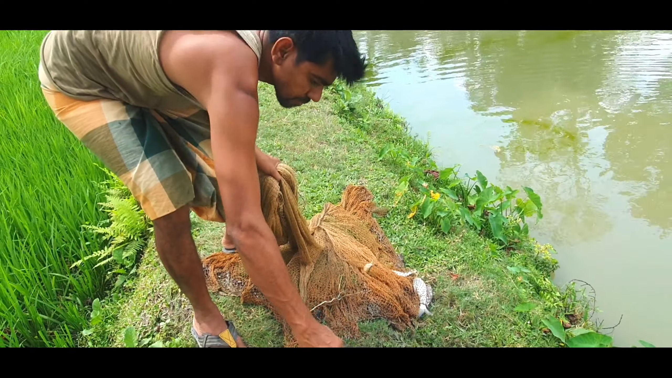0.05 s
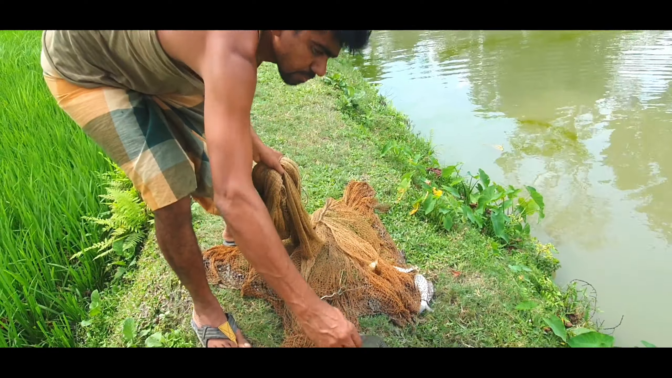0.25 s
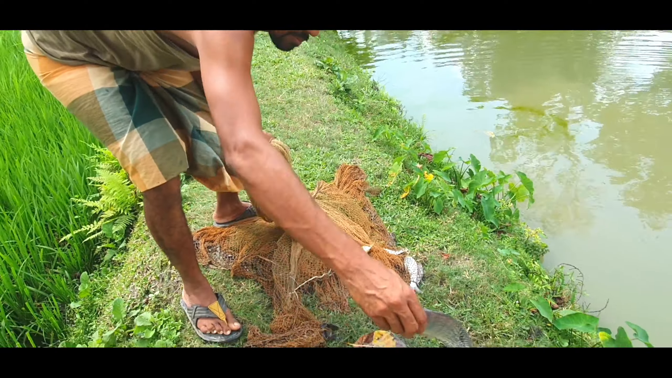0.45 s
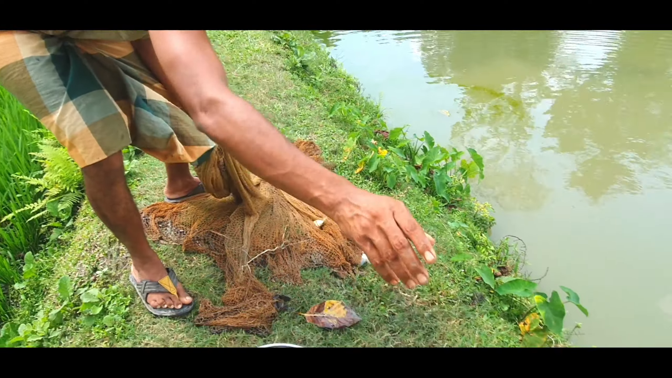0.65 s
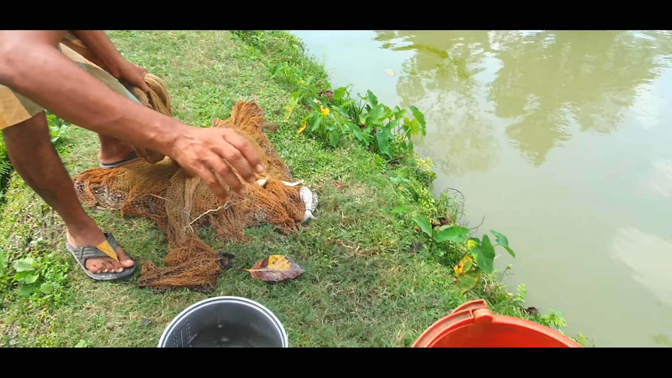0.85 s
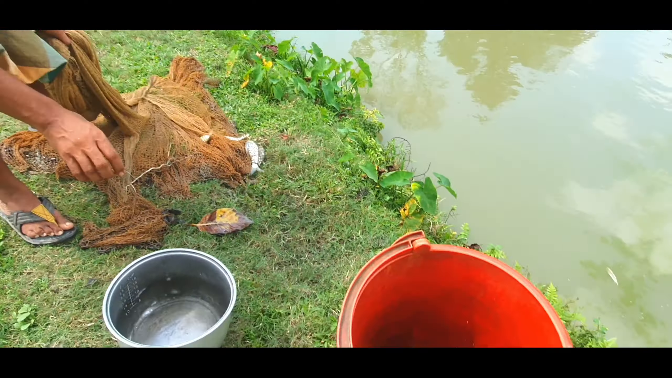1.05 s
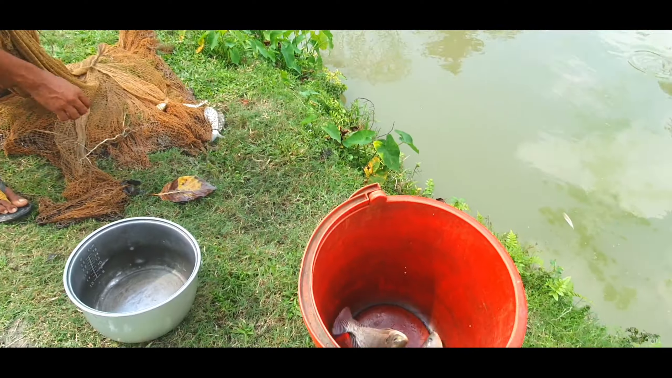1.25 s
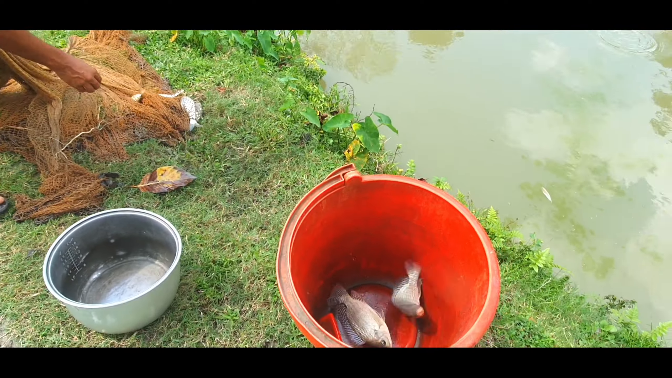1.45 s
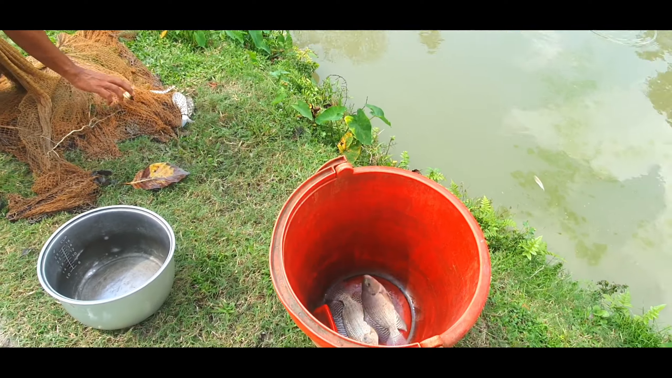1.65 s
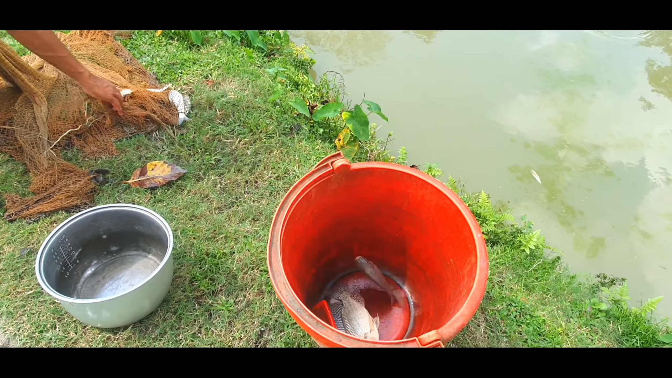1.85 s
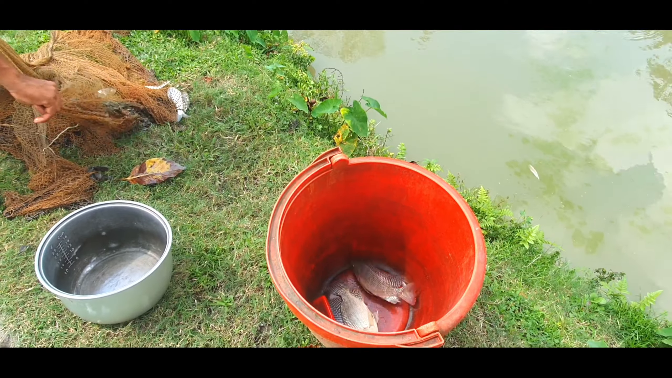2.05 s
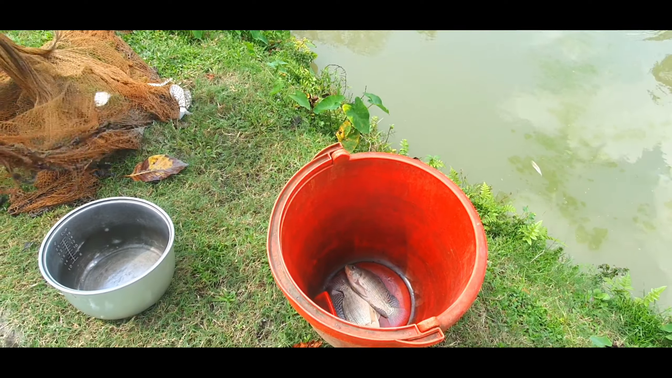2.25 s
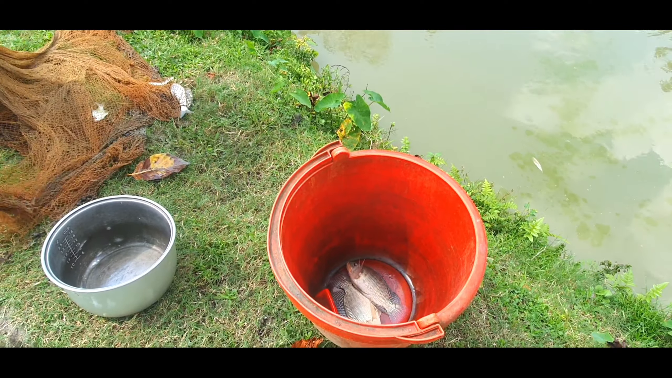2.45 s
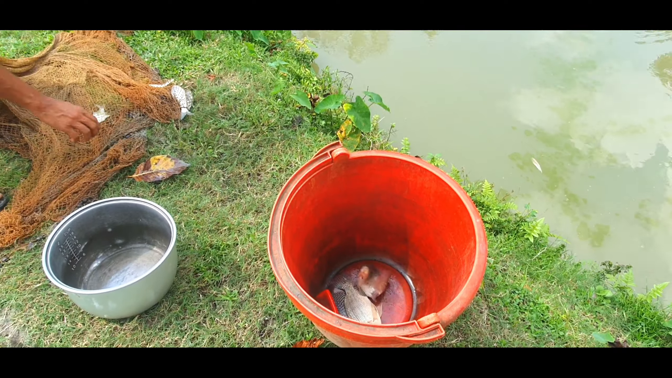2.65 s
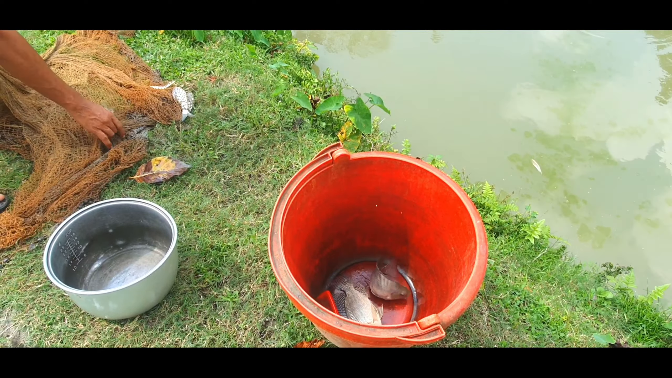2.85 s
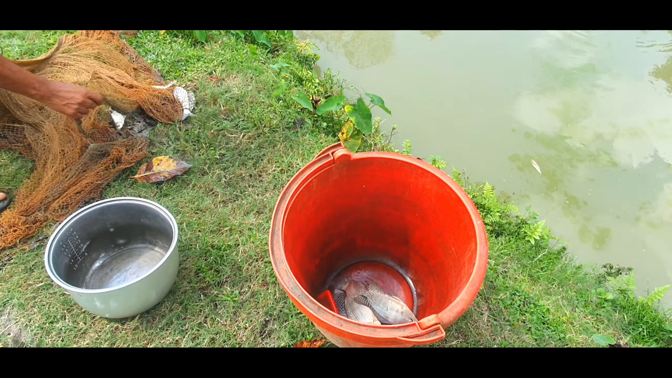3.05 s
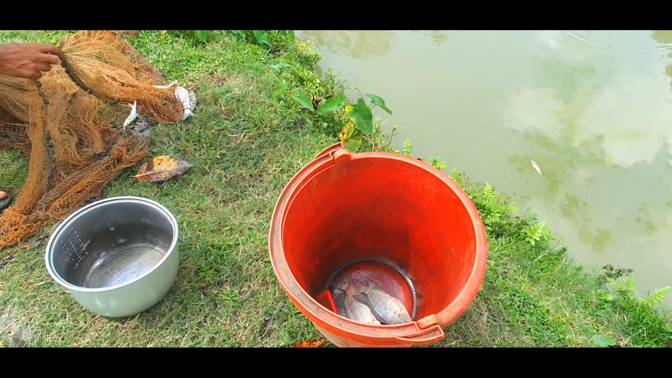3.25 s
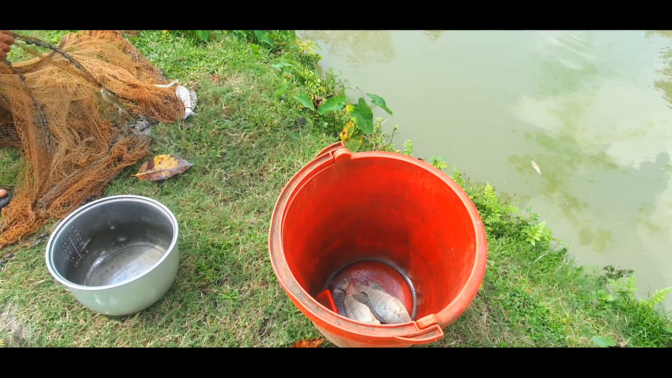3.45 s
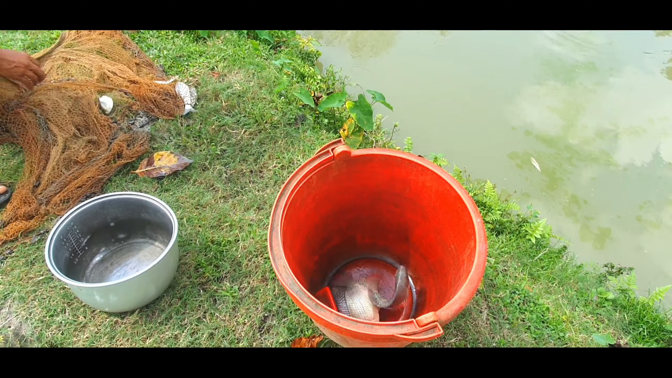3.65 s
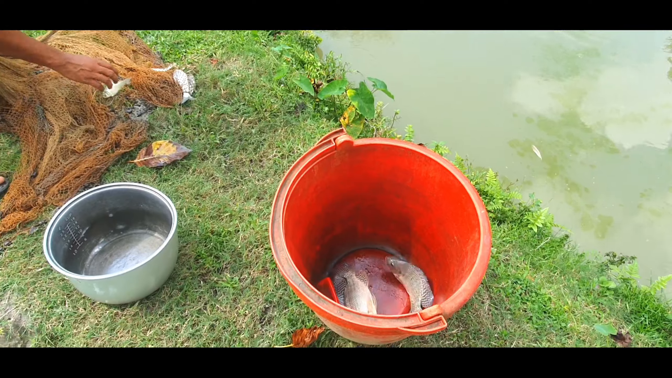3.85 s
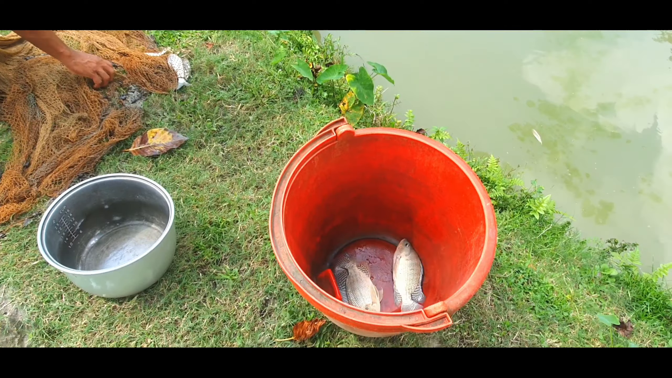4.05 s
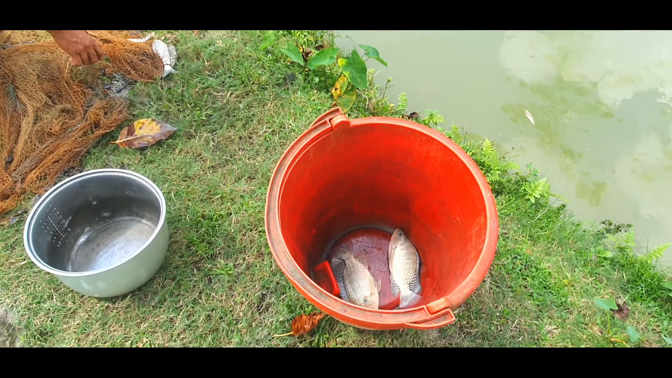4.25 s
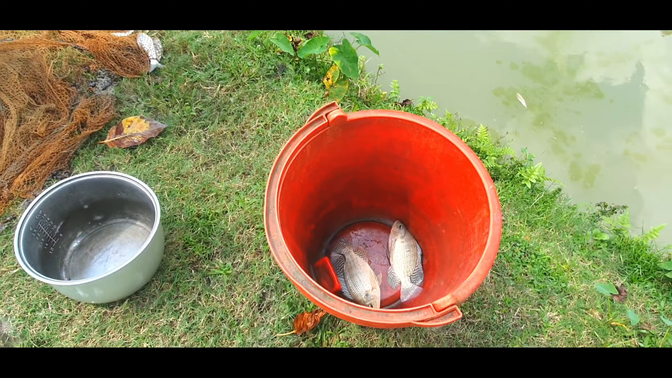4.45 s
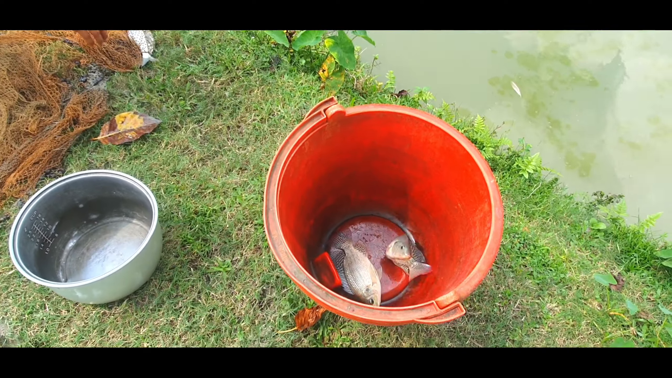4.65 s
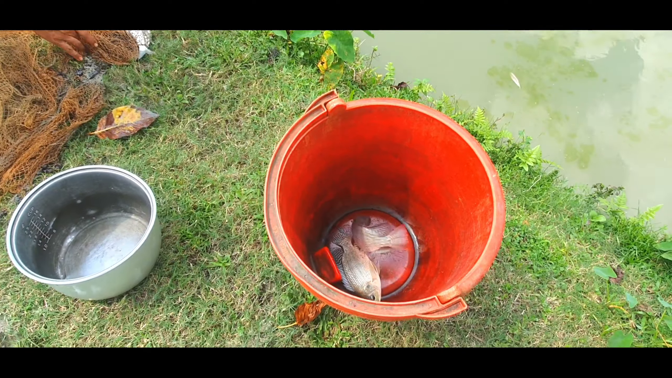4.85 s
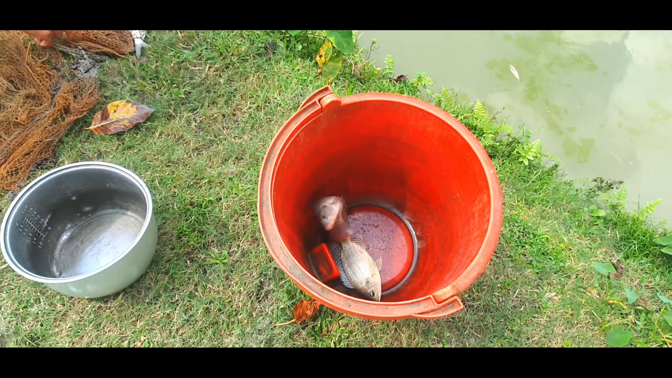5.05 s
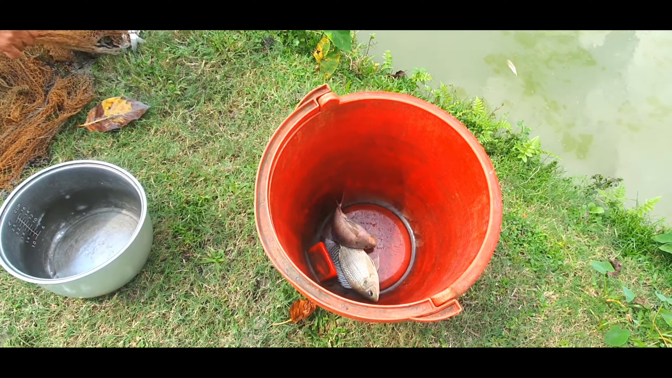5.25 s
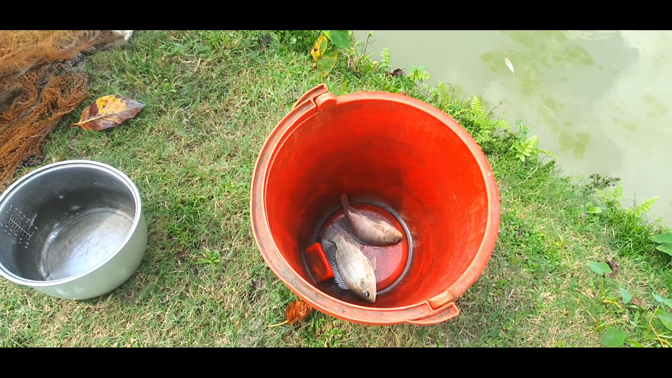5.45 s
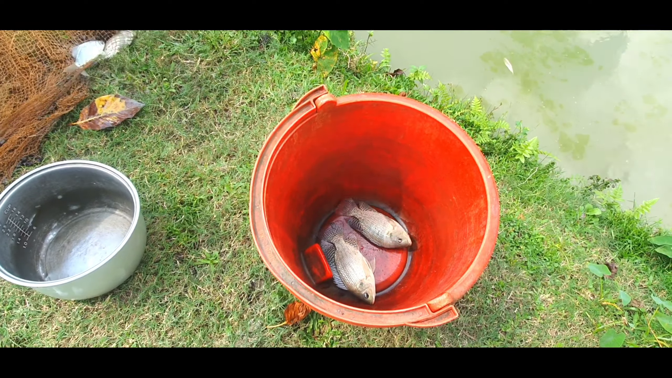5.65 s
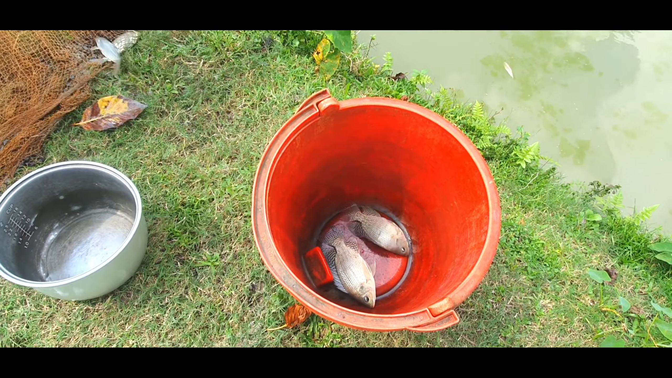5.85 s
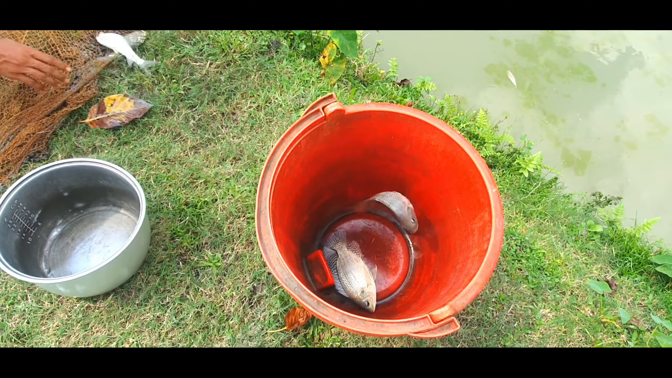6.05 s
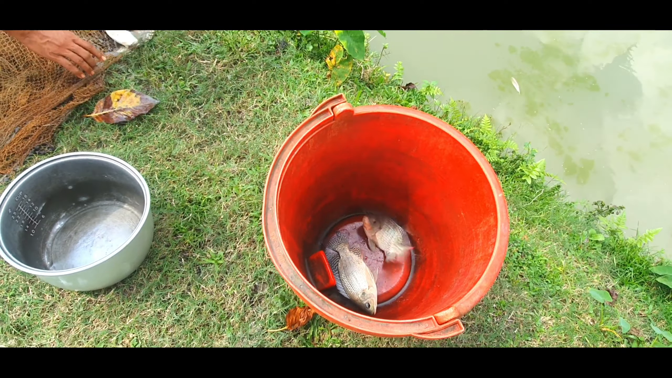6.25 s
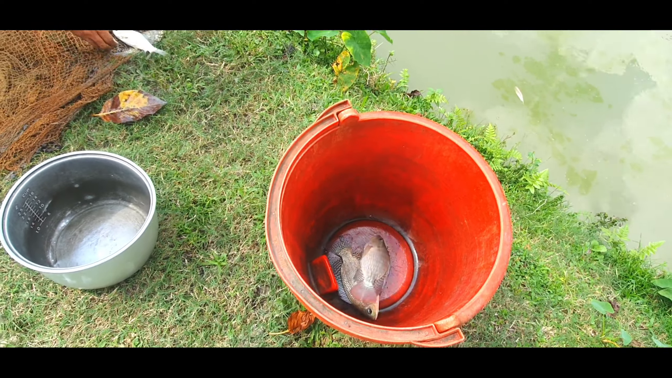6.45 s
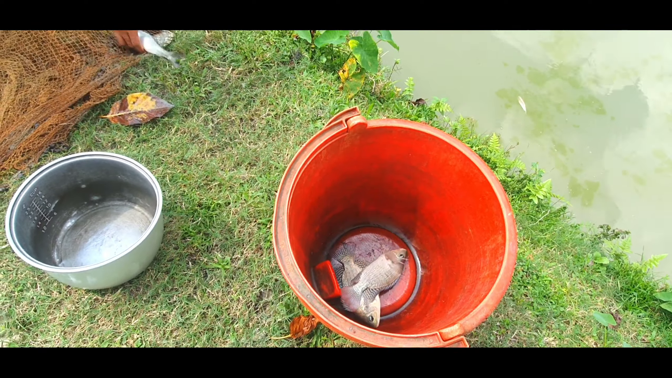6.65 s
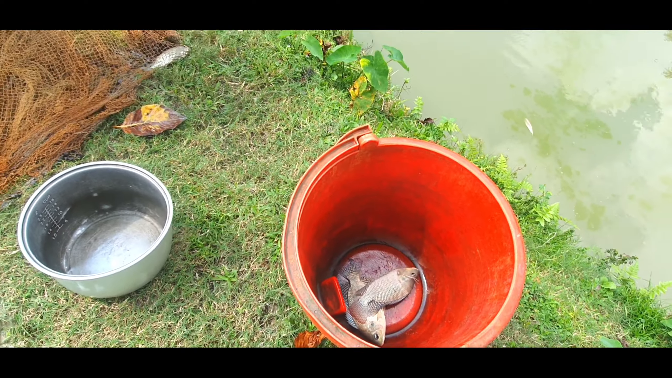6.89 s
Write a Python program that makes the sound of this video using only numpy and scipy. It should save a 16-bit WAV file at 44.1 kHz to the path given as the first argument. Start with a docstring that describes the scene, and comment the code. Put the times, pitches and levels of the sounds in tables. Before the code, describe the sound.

It opens quietly outdoors, with a faint field hiss and one barely audible falling whistle from a far bird. At about 1 second, fish start flapping in a plastic bucket: a loud hollow thump, then a quick flurry of knocks, wet slaps and slithers lasting until about 2.3 seconds, with another hard knock near 1.8. Lighter, scattered flaps follow around 2.7 to 3, 3.8 and 4.6 seconds. The heaviest thump lands near 4.9 seconds, followed by smaller knocks, and a last strong burst comes from 6.3 to 6.5 seconds. From about 1.4 seconds on, a fishing net is handled on the grass, making soft, uneven scraping and dry ticking. Crisp snaps of cord and spray cluster around 2 to 2.5 and 5.2 to 5.9 seconds. Light wind buffets the microphone with occasional low puffs, and a very faint wavering hum lingers from about 1.5 to 3.6 seconds.

```python
"""On a pond bank, fish flap in a plastic bucket. Each landing body rings the air in its hollow and
heaves its bottom; blows ring the wall modes, with a wet slap and slither. Net cord and spray snap,
and the net ticks and scrapes over grass as it is picked over. Light wind buffets the two microphone
ports above a faint field hiss, a wavering hum and one far bird."""
import sys
import numpy as np
from scipy import signal
from scipy.fft import rfft, irfft
from scipy.io import wavfile
from scipy.ndimage import uniform_filter1d

SR = 44100
rng = np.random.default_rng(int(sys.argv[2]) if len(sys.argv) > 2 else 0)


def file_out(sig):
    """Save sig as 16-bit WAV at sys.argv[1]."""
    # one column per channel
    cols = np.atleast_2d(sig).T
    # limit, then scale
    lim = np.clip(cols, -1, 1)
    pcm = np.round(lim * 32767).astype(np.int16)
    wavfile.write(sys.argv[1], SR, pcm)


N = 305172


def gain_of(db):
    """Decibels to amplitude ratio."""
    return 10 ** (np.asarray(db) / 20)


def unit_rms(x):
    """Normalisation to unit mean power."""
    return x / np.sqrt(np.mean(x ** 2) + 1e-20)


def add(mix, start_s, sound):
    """Superposition of a sound on the mix."""
    part = mix[..., round(start_s * SR):][..., :sound.shape[-1]]
    part += sound[..., :part.shape[-1]]


def colour(x, spectrum):
    """Spectral shaping by rows of (frequency_hz, density_db); white input keeps its power."""
    hz, db = np.transpose(spectrum)
    bin_hz = np.fft.rfftfreq(x.shape[-1], 1 / SR)
    gain = gain_of(np.interp(np.log(bin_hz + 1), np.log(hz + 1), db))
    return irfft(rfft(x) * unit_rms(gain), x.shape[-1])


def pan(left_db):
    """Level difference between channels: left over right."""
    return gain_of([[left_db / 2], [-left_db / 2]])


def envelope(table, column):
    """Amplitude envelope from a column of levels, interpolated in decibels."""
    columns = np.transpose(table)
    return gain_of(np.interp(np.arange(N) / SR, columns[0], columns[column]))


def drift(width_s):
    """Two channels of slow random modulation: twice-averaged noise."""
    width = int(width_s * SR)
    return unit_rms(uniform_filter1d(uniform_filter1d(rng.standard_normal((2, N)), width), width))


def thumps(hollow_hz=210, hollow_t60_s=0.08, heave_hz=114, heave_t60_s=0.082, rise_s=0.0035):
    """Cavity resonance: a soft body rings the air column; the bottom heaves about an octave lower."""
    # bodies landing on the bottom: start_s, level_db, heave_db (relative to the air's ring)
    landings = [(0.954, -9.5, -10), (1.234, -44, -14), (1.279, -23.5, -8), (1.334, -13.5, -10),
                (1.494, -22, -10), (1.782, -24, -4), (2.083, -31, -6), (2.267, -27.5, -11),
                (2.687, -40, -22), (2.711, -33.5, -28), (2.934, -24.5, 0), (3.002, -39, -3),
                (3.64, -32, -28), (3.84, -15, -5), (4.032, -36, -25), (4.554, -37.5, -4), (4.714, -30, -14),
                (4.862, -0.5, -12.5), (4.973, -34, 2), (5.178, -17.5, 1), (5.412, -18, -30),
                (5.619, -37, 3.5), (5.824, -42, -5), (5.902, -29, -5), (6.267, -16.5, 0),
                (6.298, -12, -6.5), (6.405, -45.5, 4), (6.514, -15, -4.5)]
    out, t = np.zeros(N), np.arange(SR // 4) / SR
    onset = 1 - np.exp(-(t / rise_s) ** 2)
    for start_s, level_db, heave_db in landings:
        detune, phase = rng.standard_normal(2)
        ring = gain_of(-60 * t / hollow_t60_s) * np.sin(2 * np.pi * hollow_hz * (1 + .015 * detune) * t)
        heave = gain_of(heave_db - 60 * t / heave_t60_s) * np.sin(2 * np.pi * heave_hz * t + phase)
        add(out, start_s, gain_of(level_db) * onset * (ring + heave))
    return out * pan(0.765)


def knocks(contact_s=0.00057, slap_t60_s=0.011, slither_t60_s=0.088, slither_rise_s=0.0027, width=0.54):
    """Modal excitation: impact and the friction of wet skin ring the wall; spray adds the treble."""
    # blows on the wall: start_s, level_db, centre_hz, slap_db, slither_db (both relative to the blow)
    blows = [(0.918, -47.5, 1460, 4.5, 11.5), (0.931, -25, 1380, -13, 5.5), (0.94, -26, 1940, -5, 2),
             (0.958, -3.5, 980, -1.5, -9.5), (0.969, -12, 2300, -35, -1.5), (1.022, -34.5, 2360, 4, -4.5),
             (1.093, -36, 2200, -21, -10), (1.166, -44, 2500, -20, -6), (1.233, -27.5, 1380, -6, -4.5),
             (1.277, -29.5, 829, -12.5, 6), (1.293, -19, 2500, -17, 2), (1.303, -28, 1470, 2.5, -2),
             (1.331, -13.5, 560, -9, -1.5), (1.345, -22.5, 2800, -24, 3.5), (1.364, -20, 1100, -18, -0.5),
             (1.389, -31, 1270, -11, 6), (1.466, -36.5, 1540, -26, 5.5), (1.495, -29.5, 790, -16, 6),
             (1.518, -21.5, 800, -4.5, -10), (1.544, -37.5, 1240, -7, 1), (1.573, -26.5, 2430, -7, -8.5),
             (1.664, -22, 2740, -13, -9), (1.711, -32.5, 2200, -8, 4), (1.78, -5, 1080, -20.5, -13.5),
             (1.8, -31.5, 1230, 0, -4), (1.816, -26, 501, -8, -2), (1.823, -21.5, 2290, 0, -12.5),
             (1.913, -39, 1680, -2.5, -4), (2.041, -45.5, 1330, -3, 6.5), (2.08, -22, 860, -11.5, -4),
             (2.095, -32, 880, 1, -19), (2.154, -32.5, 590, -4, -11), (2.244, -42, 501, -13, 9),
             (2.246, -24, 2590, -7, -15), (2.266, -12.5, 1270, -9.5, -17.5), (2.689, -45.5, 820, -12, 9.5),
             (2.716, -18.5, 2440, -7.5, -13.5), (2.859, -32.5, 1300, -24, 0.5),
             (2.892, -33, 860, -1.5, -4.5), (2.933, -19, 1380, -34, -6), (2.95, -34.5, 2440, -24, -1),
             (2.968, -29, 1350, -9, -8), (3.088, -41.5, 1300, 0, 1), (3.621, -38.5, 1350, -4, 3),
             (3.642, -32.5, 1230, -6.5, 5), (3.819, -29, 1260, -8, -2), (3.843, -20.5, 1310, -16.5, 2),
             (3.863, -36, 2000, -10.5, 10), (4.027, -37.5, 870, -15, -3.5), (4.087, -40, 2470, -20, -19),
             (4.561, -23, 2020, -1, -6), (4.706, -42, 860, -13, 9), (4.732, -38.5, 1990, -29, -8),
             (4.86, -14, 1250, -9.5, 1), (4.874, -15.5, 1270, -30, 0), (5.013, -39, 1140, -17, 2.5),
             (5.063, -31, 770, 2.5, -14), (5.173, -17, 953, -40, 1), (5.186, -14, 1170, -13.5, 2),
             (5.413, -25.5, 835, -42, -11), (5.505, -40, 950, 0, -1), (5.617, -40.5, 636, -9.5, 3),
             (5.824, -38, 1050, -17, -20), (5.903, -45, 563, -1.5, 8), (6.263, -27, 1130, -23, 11),
             (6.27, -21.5, 670, -18, 8), (6.285, -17.5, 590, 1, -14), (6.296, -3.5, 850, -11, -14),
             (6.311, -18, 1026, -11, -3), (6.51, -21.5, 550, -25, -12), (6.536, -29, 2010, -10.5, -4.5),
             (6.548, -37.5, 900, -15, 4), (6.591, -41, 1680, -19, -5), (6.721, -39.5, 1110, -12, -3)]
    # bending modes of the wall: pitch_hz, level_db, t60_s
    wall_modes = [(631, -4.5, 0.012), (867, 3, 0.0095), (1225, 4.5, 0.0087), (1622, -1, 0.011),
                  (2165, -1, 0.011), (2565, 7.5, 0.0054), (4100, -14, 0.013)]
    # spectrum of a wet slap: frequency_hz, density_db
    slap_spectrum = [(1500, -30), (2500, 0), (4100, -2), (5500, -8), (7500, -14), (9000, -10), (10500, -7),
                     (13000, -11), (15000, -14), (16500, -22)]
    out, t = np.zeros((2, N)), np.arange(6000) / SR
    mode_hz, mode_db, mode_t60_s = np.transpose(wall_modes)[:, :, None]
    crack = gain_of(-60 * t / slap_t60_s) * (1 - np.exp(-(t / .001) ** 2))
    for start_s, level_db, centre_hz, slap_db, slither_db in blows:
        skin, skin_side, lumps, spray, spray_side = rng.standard_normal((5, len(t)))
        # the spot struck favours modes near centre_hz; the fish's weight shifts them
        spot_db = 2.76 * lumps[:len(mode_hz), None] - 4.97 * (np.log(mode_hz / centre_hz) / 0.62) ** 2
        loaded_hz = mode_hz * (1 + .04 * skin_side[:len(mode_hz), None])
        modes = gain_of(mode_db + spot_db - 60 * t / mode_t60_s) * np.sin(2 * np.pi * loaded_hz * t)
        wall = modes.sum(0) * (1 - np.exp(-t / contact_s))  # soft flesh takes a moment to land
        slide = gain_of(slither_db - 60 * t / slither_t60_s) * (1 - np.exp(-t / slither_rise_s))
        grainy_slide = slide * gain_of(2.2 * unit_rms(uniform_filter1d(lumps, 90)))
        friction = np.array([skin, skin + width * skin_side])
        rubbed_wall = signal.fftconvolve(friction, wall[None], axes=1)[:, :len(t)]
        slither = unit_rms(grainy_slide * rubbed_wall) * np.std(slide) / 2
        splash = colour(np.array([spray, spray + width * spray_side]), slap_spectrum)
        slap = gain_of(slap_db) * (crack + gain_of(-6 - 300 * t) * grainy_slide) * splash
        left, right = gain_of(level_db) * (wall / abs(wall).max() + slither + slap)
        lag_s = abs(spray_side[0]) * .00008  # each spot lies at its own angle to the ports
        add(out[0], start_s, left)
        add(out[1], start_s + lag_s, right)
    return out * pan(2.1)


def snaps(octaves=0.77, width=0.17, t60_at_5khz_s=0.014):
    """Damped transients: cord and spray give bursts of band noise, the brighter dying sooner."""
    # snaps of net cord and spray: start_s, level_db, centre_hz
    bursts = [(0.961, -29, 4540), (1.304, -27.5, 5400), (1.3316, -29, 4940), (1.4044, -36, 11000),
              (1.7139, -25, 5170), (1.8845, -37.5, 4700), (1.9136, -45, 4700), (1.937, -28, 11700),
              (2.0182, -38, 4560), (2.0368, -30.5, 9380), (2.065, -37, 11300), (2.0976, -36, 11500),
              (2.118, -18, 11400), (2.1476, -39, 4760), (2.169, -33.5, 9460), (2.19, -35, 11400),
              (2.222, -29, 11600), (2.267, -23, 3980), (2.2872, -33, 9630), (2.2976, -28, 10600),
              (2.3102, -31, 11400), (2.336, -45, 4300), (2.5267, -37, 11300), (2.5523, -23, 11400),
              (2.5715, -35, 11700), (2.7162, -22, 5130), (3.018, -33, 8600), (3.3123, -35, 9700),
              (3.3453, -41, 10200), (3.6471, -27.5, 11200), (3.842, -27, 11200), (4.561, -25, 5800),
              (4.8602, -17, 4260), (5.1626, -30, 4200), (5.1727, -21.5, 4060), (5.243, -33, 8560),
              (5.2814, -36, 4480), (5.295, -24, 9450), (5.3115, -29, 9210), (5.3497, -33, 9100),
              (5.435, -34, 4360), (5.484, -34, 4590), (5.661, -40.5, 4570), (5.7142, -24.5, 12100),
              (5.7608, -26.5, 12700), (5.7963, -31, 9400), (5.8616, -32.5, 12100), (5.903, -36, 11500),
              (6.286, -36, 4750), (6.2961, -22, 4200)]
    out, t = np.zeros((2, N)), np.arange(4096) / SR
    bin_hz = np.fft.rfftfreq(len(t), 1 / SR) + 1
    for start_s, level_db, centre_hz in bursts:
        t60_s = t60_at_5khz_s * (5000 / centre_hz) ** 0.72
        common, side = rng.standard_normal((2, len(t)))
        band = unit_rms(np.exp(-(np.log2(bin_hz / centre_hz) / octaves) ** 2))
        noise = irfft(rfft([common, common + width * side]) * band)
        shape = gain_of(-60 * t / t60_s) * (1 - np.exp(-(t / (0.1 * t60_s)) ** 2))
        add(out, start_s, gain_of(level_db) * shape * noise)
    return out * pan(2.8)


def port_delay(sound):
    """Phase difference: sound reaches the two ports with a delay that depends on frequency."""
    # phase lead of the left port: frequency_hz, lead_rad
    port_phases = [(1500, 0.21), (2600, -2.15), (3900, -6.5), (6000, -8), (7200, -9.5), (9650, -12),
                   (12700, -19.5), (16500, -14)]
    hz, lead_rad = np.transpose([(0, 0.006)] + port_phases)
    half_shift = np.exp(.5j * np.interp(np.fft.rfftfreq(N, 1 / SR), hz, lead_rad))
    return irfft(rfft(sound) * [half_shift, 1 / half_shift], N)


def net(ticks_per_s=120, spread_db=2.0, tick_s=0.0021):
    """Friction noise: cords dragged over grass give fine dry ticks and a coarse scraping hiss."""
    # how hard the net is handled: time_s, fine_db, coarse_db
    handling = [(0, -96, -73), (.55, -88, -87), (.78, -68, -81), (1.1, -73, -67), (1.38, -57.5, -54),
                (1.6, -71, -54.5), (1.74, -54, -50.5), (2.0, -61, -71), (2.15, -54.5, -57),
                (2.33, -55, -63), (2.48, -67.5, -64), (3.08, -63, -57), (3.25, -81, -65.5),
                (4.08, -61.5, -57), (4.25, -77, -63.5), (4.62, -61, -55), (4.8, -66.5, -58.5),
                (5.3, -59, -58), (5.72, -55, -58), (6.1, -71.5, -69), (6.4, -81, -67), (6.7, -62, -58.5),
                (6.92, -90, -78)]
    # spectrum of the ticks: frequency_hz, density_db
    fine_spectrum = [(1470, -46.5), (2500, -4), (3380, -9), (4410, -3), (7190, -10), (8870, -10),
                     (11800, -4.5), (15200, -13.5), (16000, -17)]
    # spectrum of the scraping: frequency_hz, density_db
    coarse_spectrum = [(180, -76), (300, 1), (576, -7.5), (758, -2), (1590, -10.5), (2430, -4.5),
                       (3170, -16), (6000, -17.5), (7800, -55.5), (13200, -120)]
    strengths = gain_of(spread_db * np.minimum(rng.exponential(1, N), 4))
    impulses = strengths * (rng.random(N) < ticks_per_s / SR)
    ticks = signal.oaconvolve(impulses, np.exp(-np.arange(500) / SR / tick_s))[:N]
    fine = unit_rms((.45 + unit_rms(ticks)) * colour(rng.standard_normal((2, N)), fine_spectrum))
    lumps = gain_of(2.5 * drift(.008)[0])
    coarse = unit_rms(lumps * colour(rng.standard_normal((2, N)), coarse_spectrum))
    return envelope(handling, 1) * fine + envelope(handling, 2) * coarse


def swishes(octaves=0.48, block=16384):
    """Sliding friction: the net drawn through grass gives narrow-band noise that swells and fades."""
    # pulls of the net: start_s, length_s, level_db, centre_hz
    pulls = [(0.618, 0.34, -61, 2300), (1.37, 0.058, -45.5, 1820), (2.52, 0.066, -50, 11500),
             (3.926, 0.13, -58.5, 2150), (4.451, 0.29, -54, 2200)]
    out, bin_hz = np.zeros((2, N)), np.fft.rfftfreq(block, 1 / SR) + 1
    for start_s, length_s, level_db, centre_hz in pulls:
        size = min(round(length_s * SR), block)
        band = np.exp(-(np.log2(bin_hz / centre_hz) / octaves) ** 2)
        scrape = unit_rms(irfft(rfft(rng.standard_normal((2, block))) * band))
        add(out, start_s, gain_of(level_db) * scrape[:, :size] * np.sqrt(np.hanning(size)))
    return out


def wind(crossfeed=.2):
    """Turbulence: low, lumpy pressure fluctuations, mostly uncorrelated at the two ports."""
    # strength of the buffeting: time_s, level_db
    buffeting = [(0.0, -61), (0.17, -71), (0.33, -80), (1.54, -56), (2.04, -59), (2.27, -56), (2.56, -59.5),
                 (3.7, -55.5), (3.87, -56), (4.32, -55.5), (4.66, -59), (5.03, -48), (5.32, -55),
                 (5.76, -52), (5.93, -60), (6.21, -55.5), (6.45, -52), (6.92, -56)]
    # spectrum of the turbulence: frequency_hz, density_db
    gust_spectrum = [(8.8, -46.5), (15, -35.5), (40, 0), (70, 5.5), (117, -5), (262, -8.5), (345, -9.5),
                     (432, -10), (700, -16.5), (910, -46), (1540, -120)]
    lumps = gain_of(3.5 * drift(.035))
    eddies = lumps * colour(rng.standard_normal((2, N)), gust_spectrum)
    pressure = unit_rms(eddies + crossfeed * eddies[::-1])
    return envelope(buffeting, 1) * pressure * pan(-1.3)


def puffs(jitter_rad=0.72, flutter=0.57):
    """Pressure pulses: each puff of wind is a few uneven low swings, different at each port."""
    # puffs that bump the ports: start_s, level_db, pitch_hz, length_s, left_over_right_db
    bumps = [(0.065, -55, 61.6, 0.08, -17), (1.016, -38, 82.6, 0.09, -4), (2.192, -30.5, 75, 0.058, 2.0),
             (2.338, -66, 89, 0.057, -23), (3.465, -55.5, 57, 0.11, -30.5), (4.392, -41, 48.6, 0.05, 2),
             (5.032, -36.5, 87.6, 0.05, 9), (5.085, -41, 62.4, 0.085, -15), (5.526, -44, 50, 0.094, 23),
             (5.644, -36, 55.5, 0.14, 4), (5.705, -34, 71.5, 0.027, 1.5), (6.566, -41.5, 71, 0.064, -21),
             (6.692, -60, 104.6, 0.063, -17)]
    out = np.zeros((2, N))
    for start_s, level_db, pitch_hz, length_s, left_db in bumps:
        t = np.arange(0, length_s, 1 / SR)
        noise = rng.standard_normal((4, SR // 4))
        wobble = unit_rms(uniform_filter1d(uniform_filter1d(noise, 250), 250))[:, :len(t)]
        swing = (1 + flutter * wobble[2:]) * np.sin(2 * np.pi * pitch_hz * t + jitter_rad * wobble[:2])
        add(out, start_s, gain_of(level_db) * pan(left_db) * swing * np.sin(np.pi * t / length_s))
    return out


def field_hiss(level_db=-61.5):
    """Diffuse noise: a nearly steady distant hiss, uncorrelated at the two ports."""
    # spectrum of the open field: frequency_hz, density_db
    hiss_spectrum = [(71, -29), (120, -7), (410, -18.5), (605, -16), (742, 0.5), (930, -3.5), (1980, -2.5),
                     (2380, -3), (4880, -6), (7350, -13.5), (10600, -11), (14400, -17.5), (16000, -40)]
    level = gain_of(level_db + 0.43 * drift(0.17))
    return level * unit_rms(colour(rng.standard_normal((2, N)), hiss_spectrum))


def hum(pitch_hz=340, fade_s=.15):
    """Random modulation of pitch and amplitude makes a faint tone rough and wavering."""
    # spells of humming: start_s, length_s, level_db
    spells = [(1.55, .45, -67), (2.15, 1.5, -65.5)]
    t, level = np.arange(N) / SR, np.zeros(N)
    waver, swell = drift(0.05)
    cycles = np.cumsum(pitch_hz * (1 + .005 * waver)) / SR
    for start_s, length_s, level_db in spells:
        inside_s = np.minimum(t - start_s, start_s + length_s - t)
        level += gain_of(level_db) * np.clip(inside_s / fade_s, 0, 1)
    return np.sqrt(2) * level * gain_of(2.5 * swell) * np.sin(2 * np.pi * cycles)


def bird(start_s=.04, length_s=.175, pitch_hz=1500, sag_hz_per_s=540, level_db=-65, fade_db_per_s=40):
    """Frequency modulation: one far whistle glides down and fades, made breathy by pitch jitter."""
    out, t = np.zeros(N), np.arange(0, length_s, 1 / SR)
    jitter = 1 + 0.017 * drift(0.0051)[0, :len(t)]
    cycles = np.cumsum((pitch_hz - sag_hz_per_s * t) * jitter) / SR
    level = gain_of(level_db - fade_db_per_s * t) * np.sqrt(np.hanning(len(t)))
    add(out, start_s, np.sqrt(2) * level * np.sin(2 * np.pi * cycles))
    return out


def scene():
    """Superposition: bucket, net, wind and background sum at the two ports."""
    bucket = port_delay(thumps() + knocks() + snaps())
    return bucket + net() + swishes() + wind() + puffs() + field_hiss() + hum() + bird()


def record(dry):
    """Band limiting: a linear-phase low-pass filter removes the highest treble."""
    cutoff_hz = 16350
    lowpass = signal.firwin(601, cutoff_hz, window=("kaiser", 10), fs=SR)
    return signal.oaconvolve(dry, lowpass[None], "same")


dry = scene()
out = record(dry)
file_out(out)
```